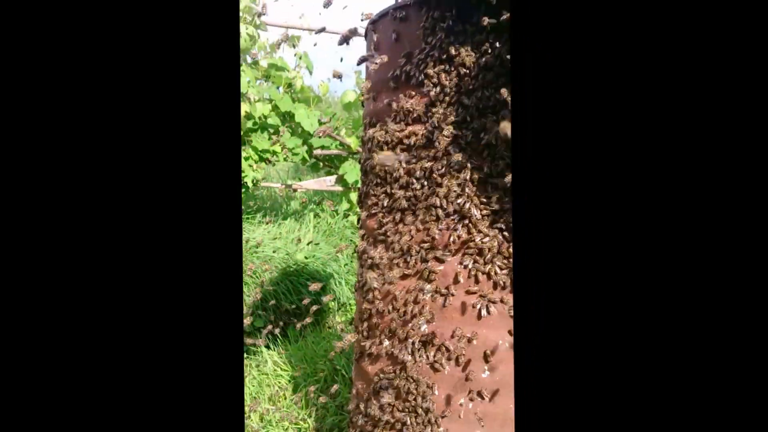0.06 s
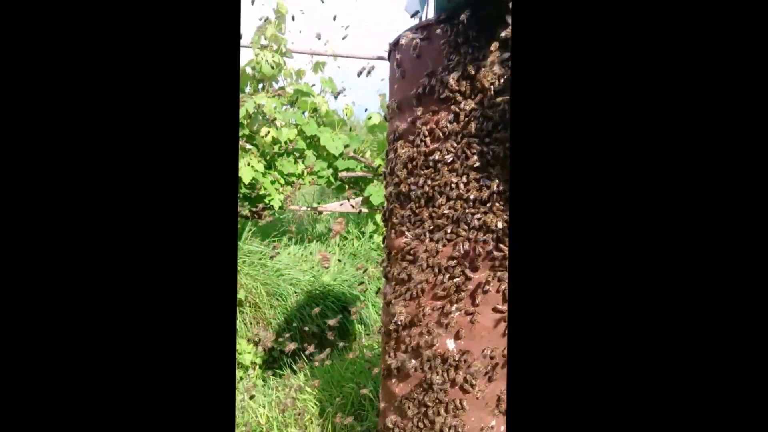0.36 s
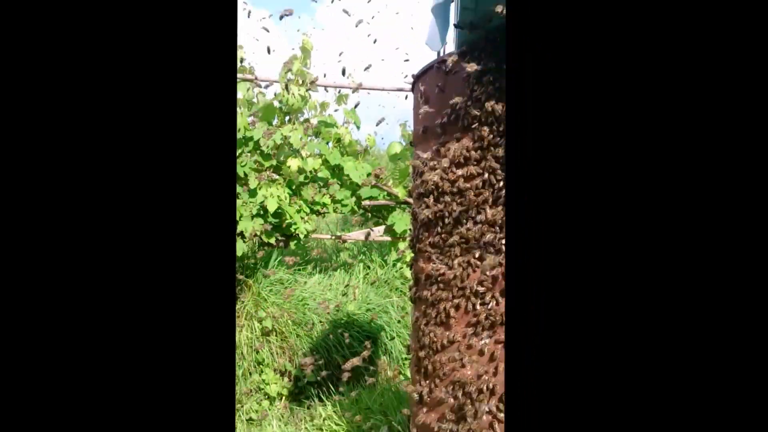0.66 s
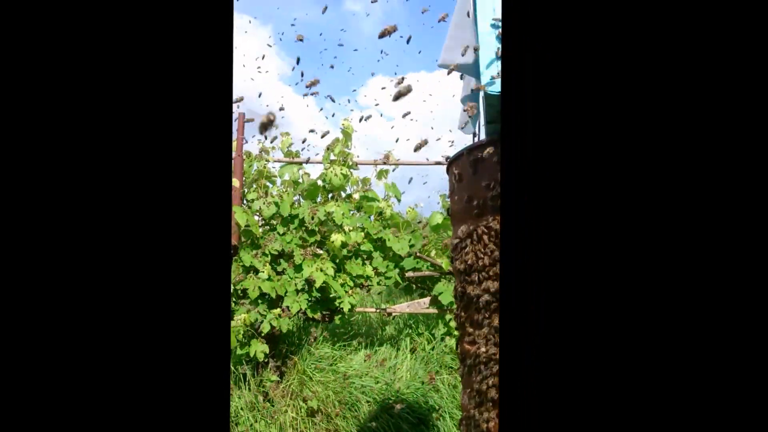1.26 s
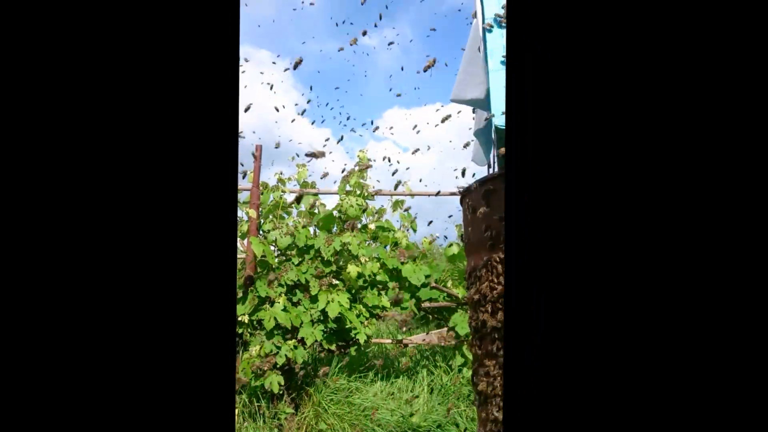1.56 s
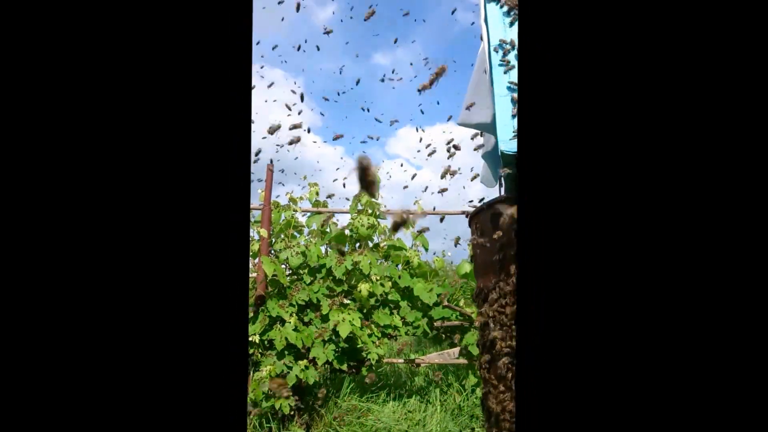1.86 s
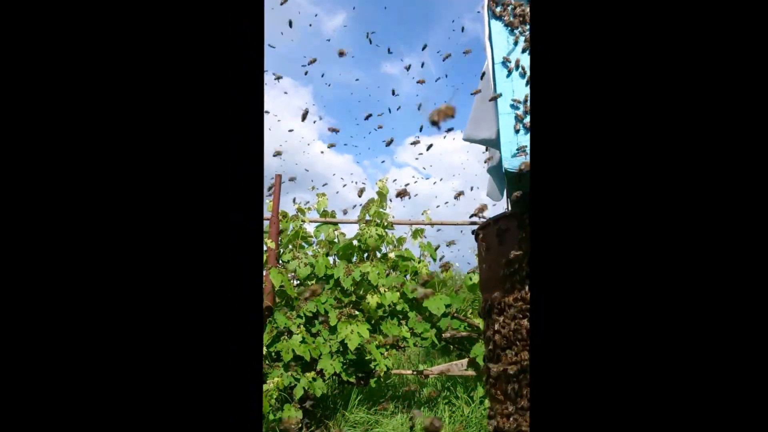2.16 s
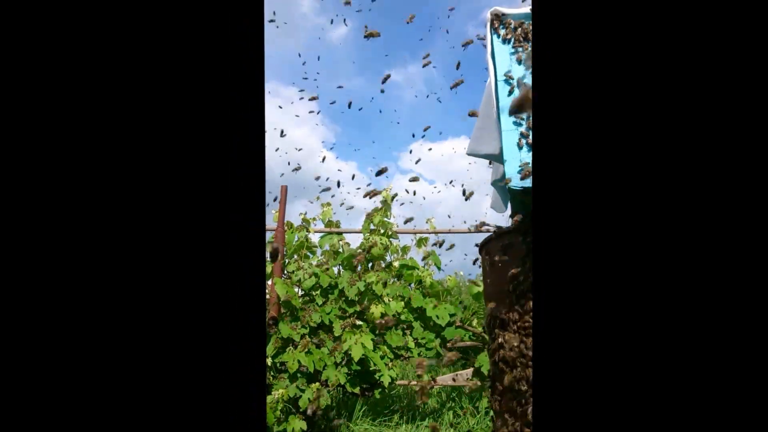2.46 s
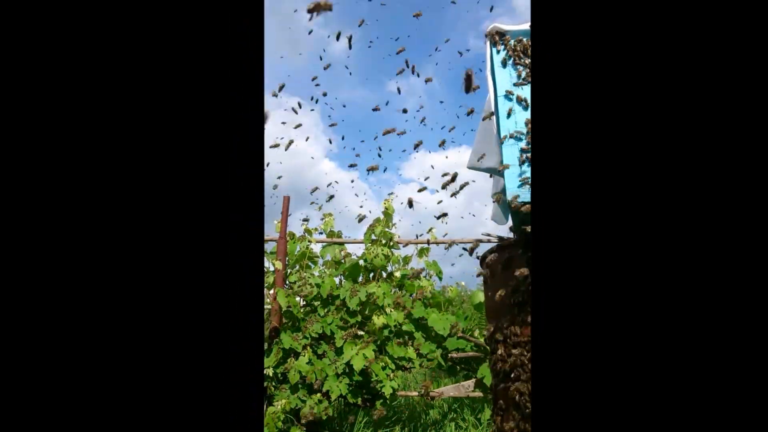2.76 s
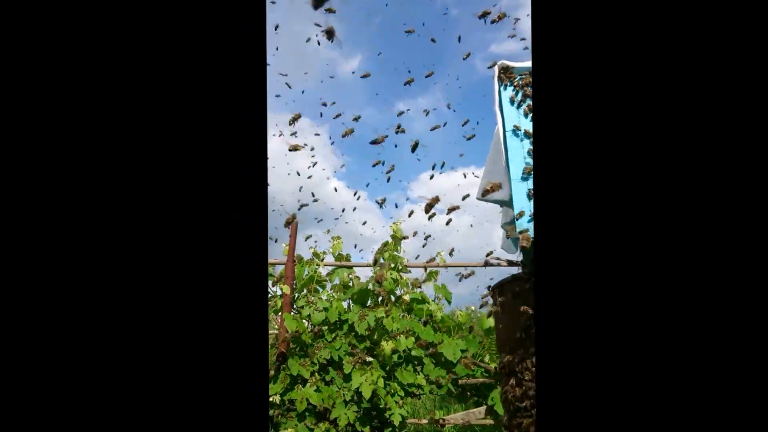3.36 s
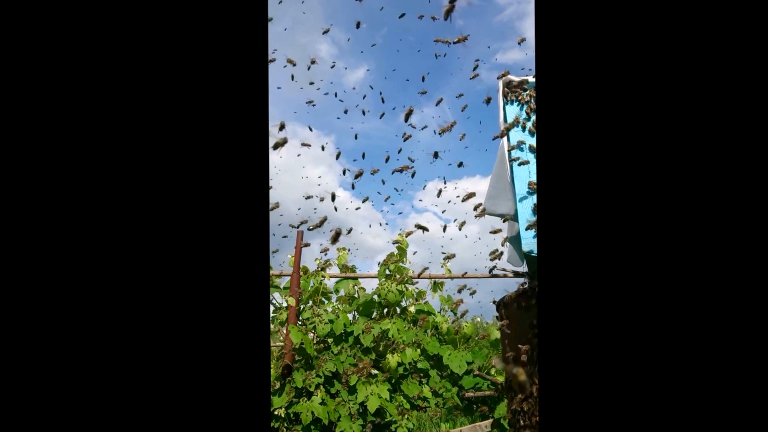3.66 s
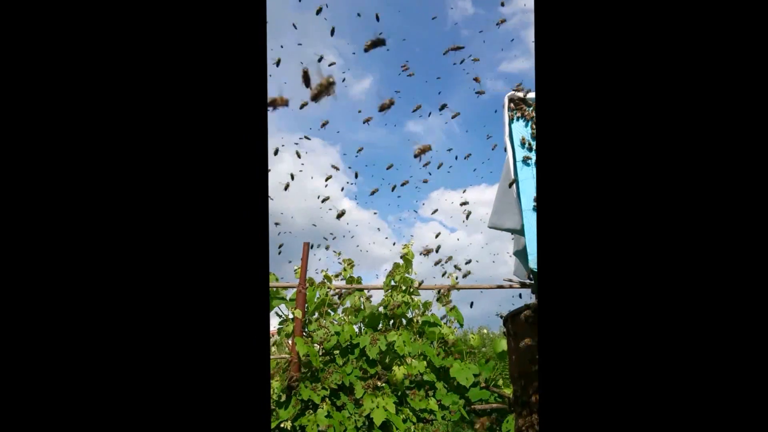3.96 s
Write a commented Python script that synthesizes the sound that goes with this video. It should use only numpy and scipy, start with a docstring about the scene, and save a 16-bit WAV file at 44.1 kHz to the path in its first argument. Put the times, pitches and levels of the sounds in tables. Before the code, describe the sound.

Dozens of bees hum in a wavering, continuous drone outdoors, over a faint high hiss and soft wind rumble. Nearer bees fly by, then one buzzes briefly and loudly right against the left microphone.

```python
"""A garden, with a pair of microphones standing inside a honeybee swarm.
Dozens of bees buzz all around, each on its own wavering wingbeat. A few pass nearer and drop in pitch;
one skims the left microphone with a loud buzz, and the air thrown by its wings briefly rasps.
Behind them lie a steady high hiss and a light breeze that rumbles on both microphones."""
import sys
import numpy as np
from scipy import signal
from scipy.fft import rfft, irfft
from scipy.io import wavfile
from scipy.ndimage import uniform_filter1d

SR = 44100
rng = np.random.default_rng(int(sys.argv[2]) if len(sys.argv) > 2 else 0)


def master(y):
    """Save y as 16-bit WAV."""
    cut = np.clip(np.atleast_2d(y).T, -1, 1)
    pcm = np.round(cut * 32767)  # scale
    wavfile.write(sys.argv[1], SR, pcm.astype(np.int16))


N = 176400
T = np.arange(N) / SR
HZ = np.fft.rfftfreq(N, 1 / SR)
WING_HZ = 232.15  # a typical bee's wingbeat
MIC_GAP_S = .00042  # longest travel time between the microphones

# A wingbeat heard from a distance. Each row: harmonic number, level in dB.
DISTANT_HARMONICS = [(1, -3.5), (2, 3.5), (3, -5.5), (4, -2), (5, -5.5), (6, -8), (8, -8.5), (12, -12),
                     (16, -19.5), (20, -33)]


def amp(db):
    """Decibels to gain."""
    return 10 ** (np.asarray(db) / 20)


def read(points, at):
    """Reads a table on a logarithmic axis."""
    x, value = np.transpose(points)
    return np.interp(np.log(at + 1e-6), np.log(x), value)


def bell(x, width):
    """A bell curve that peaks at 1 where x is 0."""
    return np.exp(-.5 * (x / width) ** 2)


def noise(spectrum):
    """Noise with the given density in dB per Hz."""
    return irfft(rfft(rng.standard_normal(N)) * amp(read(spectrum, HZ)), N) * np.sqrt(SR / 2)


def drift(rate_hz, size=800):
    """A smooth random wander of unit spread, mostly slower than the given rate."""
    f = np.fft.rfftfreq(size, T[-1] / size)
    x = irfft(rfft(rng.standard_normal(size)) * (f > 0) / (1 + (f / rate_hz) ** 2), size)
    return np.interp(T, np.linspace(0, T[-1], size), x / x.std())


def swarm(count=64, spread_hz=11.5, slow_tail_hz=2, swerve_hz=9.5, wander_db=7):
    """Dozens of bees all around the microphones, each swerving, nearing and receding."""
    # The swarm's balance. Each row: frequency in Hz, left minus right in dB.
    balance = [(230, -8.5), (470, -4), (950, -3), (1500, -5), (2400, -3.5), (4000, 1)]
    # Its loudness. Each row: time in seconds, level in dB.
    loudness = [(0, -44.5), (.8, -44), (1.45, -45.5), (2.2, -44.5), (3.1, -43.5), (3.6, -45), (4, -44)]
    out = np.zeros((2, N))
    ranks = (np.arange(count) + .5) / count
    for rank, bearing in zip(ranks, rng.permutation(2 * ranks - 1)):
        offset = .5 * np.log(rank / (1 - rank))  # most bees beat near the middle pitch
        hz = WING_HZ + spread_hz * offset + slow_tail_hz * min(offset, 0) + swerve_hz * drift(rate_hz=3)
        nearness = 2 * np.tanh(drift(rate_hz=3.26) / 2)
        out += distant_bee(hz, bearing) * amp(wander_db * nearness)
    lean_db = read(balance, HZ) / 2
    hum = irfft(rfft(out / out.std()) * amp([lean_db, -lean_db]), N)
    return hum * amp(np.interp(T, *np.transpose(loudness)))


def distant_bee(hz, bearing):
    """A bee on a pitch curve; off to one side, it reaches one microphone a little before the other."""
    cycle = wingbeat()
    left_turns = np.cumsum(hz) / SR
    turns = np.array([left_turns, left_turns + bearing * MIC_GAP_S * hz])
    return cycle[(turns * len(cycle)).astype(int) % len(cycle)]


def wingbeat(size=4096, count=20, vary_db=3):
    """One cycle of a distant bee's buzz; every bee has a slightly different one."""
    k = np.arange(1, count + 1)
    gains = amp(read(DISTANT_HARMONICS, k) + vary_db * rng.standard_normal(count))
    phases = np.exp(2j * np.pi * rng.random(count))
    cycle = irfft(np.r_[0, gains * phases], size)
    return cycle / cycle.std()


def closest_bee(count=18, beat_vary_db=1.3, stroke_knee=1.4):
    """A bee skims the left microphone, one steep pressure pulse per wingbeat; faint on the right."""
    # Its flight. Each row: time in seconds, wingbeat in Hz, gain in dB, brightness in dB per octave,
    # share of the close timbre from 0 to 1.
    flight = [(3.17, 227, -67, -7, 0), (3.211, 213.5, -50, -3.5, 0), (3.261, 210.3, -39, -1, 0),
              (3.285, 204.8, -36, 0.5, 0.24), (3.314, 210, -28, 0.5, 0.6), (3.33, 209.1, -23.5, 1, 0.46),
              (3.339, 227.9, -34.5, -1, 0), (3.358, 228, -27, 1, 0.38), (3.371, 216, -23.5, -.8, .25),
              (3.381, 219.5, -20.8, -1.2, .65), (3.394, 218.6, -16.7, -.1, 1), (3.405, 218.6, -19, -1, 1),
              (3.42, 220, -16, -2.2, 0.72), (3.437, 205.7, -28.5, -4.5, 0), (3.452, 221, -27, -4.5, 0.01),
              (3.467, 209, -43.5, -9, 0), (3.48, 227, -48, -12, 0.1), (3.493, 229.4, -68, -7, 0)]
    # Its timbre right at the microphone. Each row: harmonic number, level in dB.
    close_timbre = [(1, 0), (2, -1.5), (3, -4.5), (4, -6.3), (5, -7.3), (6, -11), (7, -14), (8, -17.5),
                    (9, -21), (10, -27), (12, -35), (14, -45), (18, -58)]
    # Its timbre as it comes and goes, in the same columns.
    oblique_timbre = [(1, 3), (2, 4.5), (3, -10), (4, -12), (5, -3.5), (6, -30), (7, -29), (9, -37),
                      (12, -48), (20, -62)]
    # A band of overtones flares just before it is nearest.
    flare_s, flare_half_s, flare_hz, flare_half_hz, flare_db = (3.357, 0.018, 1750, 360, 18)
    times, *columns = np.transpose(flight)
    hz, db, bright_db, share = (uniform_filter1d(np.interp(T, times, c), size=400) for c in columns)
    share = np.clip(share, 0, 1)
    on = (T > times[0]) & (T < times[-1])
    angle = 2 * np.pi * np.cumsum(hz * on) / SR
    flare = flare_db * bell(T - flare_s, flare_half_s)
    buzz = np.zeros(N)
    for k in range(1, count + 1):
        timbre_db = share * read(close_timbre, k) + (1 - share) * read(oblique_timbre, k)
        partial_db = db + bright_db * np.log2(k) + timbre_db
        partial_db += beat_vary_db * (1 - 1 / k) * drift(rate_hz=50)  # no two beats are quite alike
        partial_db += flare * bell(k * hz - flare_hz, flare_half_hz)
        buzz[on] += np.sqrt(2) * amp(partial_db[on]) * np.cos(k * angle[on] - np.arctan(k / stroke_knee))
    right_db = -36 + .68 * (db - db.max())
    right = distant_bee(hz, bearing=0)[1] * on * amp(right_db)
    return np.array([buzz, right]), angle


def wing_rasp(close_angle, focus=1.1):
    """Air thrown by wings right at a microphone hits it in one puff per beat."""
    # Each row: peak time, rise and fall in seconds, gain in dB, tilt in dB per octave,
    # microphone (0 left, 1 right).
    rasps = [(3.364, .02, .007, 0, 0, 0), (3.398, .012, .014, -10, -5, 0), (.76, .014, .012, -13, 0, 1)]
    # Their colour, left then right. Each row: frequency in Hz, density in dB per Hz.
    colours = [
        [(600, -88), (1600, -76), (2400, -71), (3300, -69), (4000, -75), (4900, -73), (5800, -79),
         (7000, -75.5), (8200, -76), (9400, -69.5), (11000, -79), (15500, -90)],
        [(600, -80), (1500, -65), (2600, -69), (4000, -80), (7000, -74), (10000, -77), (13500, -74),
         (15500, -77)],
    ]
    out = np.zeros((2, N))
    for s, rise_s, fall_s, db, tilt_db, mic in rasps:
        mic = int(round(mic))
        angle = 2 * np.pi * WING_HZ * T if mic else close_angle
        puffs = np.exp(focus * np.cos(angle - .7)) / np.sqrt(np.i0(2 * focus))  # unit power
        colour = [(hz, level + tilt_db * np.log2(hz / 3000)) for hz, level in colours[mic]]
        out[mic] += noise(colour) * puffs * amp(db) * bell(T - s, np.where(T < s, rise_s, fall_s))
    return out


def passing_bees(count=10, half_s=.042, half_drop_hz=6.085, overtones_db=-8):
    """Nearer bees swell out of the swarm, round in tone, and drop in pitch as they go by."""
    # Each row: time in seconds, wingbeat in Hz, second harmonic's level in dB, left minus right in dB,
    # fundamental against the second harmonic in dB.
    passes = [(.30, 241.8, -51.5, -7, -14), (0.329, 212, -48.5, -1, -4), (.50, 234.6, -60, 3, 6),
              (.62, 230.2, -49.5, 5, -12), (.73, 220, -50.5, -9, -9), (.99, 220.8, -47, 0, -21),
              (1.24, 237.3, -51.5, -11, -6), (1.52, 206.3, -60, 5, -12), (2.06, 236, -50.5, -8, -2.5),
              (2.27, 242, -55.5, 4, 6), (2.47, 244.2, -55, -3, -18), (2.622, 218.5, -52, -12, -16),
              (2.771, 226.8, -50, -3, -19), (2.92, 241.6, -49, -3, 1.5), (3.161, 225.5, -50.5, 7, -5),
              (3.9, 235.4, -53, -8, -5)]
    out = np.zeros((2, N))
    k = np.arange(1, count + 1)
    for s, hz, db, lean_db, fundamental_db in passes:
        progress = (T - s) / half_s
        on = abs(progress) < 4
        pitch = hz - half_drop_hz * np.tanh(progress[on]) + 2.5 * drift(rate_hz=8.9)[on]
        gains = amp(np.r_[fundamental_db, 0, read(DISTANT_HARMONICS, k[2:]) + overtones_db])
        turns = np.cumsum(pitch) / SR
        phases = rng.random(count)
        right_shift = rng.uniform(-.73, 1) * MIC_GAP_S * hz
        for mic, sign in enumerate((1, -1)):
            buzz = np.cos(2 * np.pi * (np.outer(turns + mic * right_shift, k) + phases)) @ gains
            out[mic, on] += np.sqrt(2) * buzz * bell(progress[on], 1) * amp(db + sign * lean_db / 2)
    return out


def hiss(flicker_db=.52):
    """An even high hiss, unrelated and differently coloured at the two microphones."""
    # Its colour, left then right. Each row: frequency in Hz, density in dB per Hz.
    colours = [
        [(100, -70.5), (1000, -81), (3000, -93), (4200, -87.5), (6000, -88.5), (7500, -87), (9400, -82.5),
         (10400, -88.5), (12000, -94.5), (15500, -100)],
        [(100, -92.5), (1000, -80), (3000, -95), (4200, -92.5), (5500, -90.5), (6900, -86.5), (7800, -91),
         (8600, -88.5), (9700, -97), (11000, -99.5), (13500, -102), (15500, -103)],
    ]
    # Its slow sway. Each row: time in seconds, left gain in dB, right gain in dB.
    sway = [(0, -0.8, 1.6), (.7, -1.1, 2.2), (1.2, -0.5, 1), (1.8, -2, 0.8), (3, -1.6, 0), (4, -2, 2.5)]
    times, *gains_db = np.transpose(sway)
    flicker = flicker_db * drift(rate_hz=17)
    return np.array([noise(colour) * amp(np.interp(T, times, db) + flicker)
                     for colour, db in zip(colours, gains_db)])


def breeze(lumps_db=2, trim_db=-2.5):
    """A light breeze buffets each microphone separately with a lumpy low rumble."""
    # Its colour, left then right. Each row: frequency in Hz, density in dB per Hz.
    colours = [
        [(8, -83), (22, -62), (45, -69.5), (65, -59.5), (100, -66), (170, -77), (300, -86), (800, -110)],
        [(8, -47.5), (22, -56.5), (43, -51), (65, -56.5), (100, -66), (150, -81), (250, -103), (800, -112)],
    ]
    # Its gusts, left then right. Each row: time in seconds, gain in dB.
    gusts = [
        [(0, 12.5), (.1, -19), (.2, 10), (.3, -1), (.55, 1.5), (.85, -3), (1.12, -20), (1.2, -6), (1.35, 1),
         (1.65, 6.5), (1.9, -0.5), (2.05, -14), (2.42, 5), (2.65, -19), (3.3, -17), (3.4, 7), (3.6, -19),
         (3.9, -34)],
        [(0, -8), (.07, 2), (.35, -4.5), (.65, -6.5), (.89, 7.5), (1.05, -4.5), (1.24, 3), (1.4, -4),
         (1.6, -0.5), (2, -6.5), (2.8, -5), (3.15, -2), (3.4, -6), (3.6, -4), (4, -7.5)],
    ]
    out = []
    for colour, strength in zip(colours, gusts):
        gust_db = np.interp(T, *np.transpose(strength)) + trim_db
        out.append(noise(colour) * amp(gust_db + lumps_db * drift(rate_hz=11)))
    return np.array(out)


def air_puffs():
    """Short eddies thud on the left microphone."""
    # Each row: peak time in seconds, half length in seconds, gain in dB.
    eddies = [(.53, 0.034, 0.5), (1.197, 0.015, 3.5), (1.686, 0.032, -12), (3.393, 0.023, 4)]
    # Their colour. Each row: frequency in Hz, density in dB per Hz.
    colour = [(40, -67), (120, -62), (240, -66), (300, -82), (500, -105)]
    level = sum(amp(db) * bell(T - s, half_s) for s, half_s, db in eddies)
    return np.array([noise(colour) * level, np.zeros(N)])


def scene():
    """The bees, the hiss and the breeze at the left and right microphones."""
    buzz, angle = closest_bee()
    return swarm() + passing_bees() + buzz + wing_rasp(angle) + hiss() + breeze() + air_puffs()


def record(dry, knee=.8, ceiling=.98, edge_hz=15750):
    """The recorder gently rounds off any peak above the knee, then cuts the highest treble."""
    over = np.maximum(abs(dry) - knee, 0)
    headroom = ceiling - knee
    rounded = dry - np.sign(dry) * (over - headroom * np.tanh(over / headroom))
    lowpass = signal.firwin(511, edge_hz, window=("kaiser", 9), fs=SR)
    return signal.oaconvolve(rounded, lowpass[None], "same", axes=1)


dry = scene()
out = record(dry)
master(out)
```